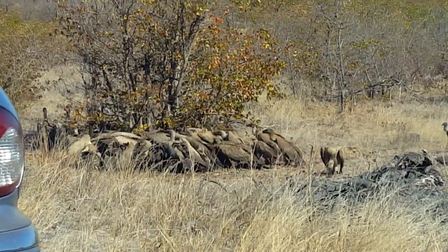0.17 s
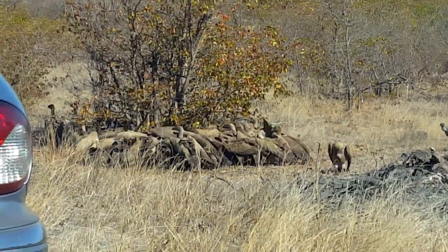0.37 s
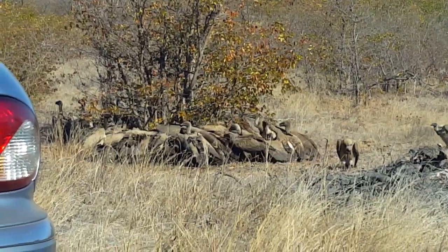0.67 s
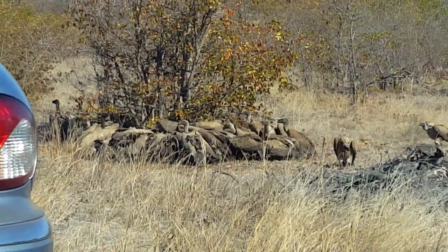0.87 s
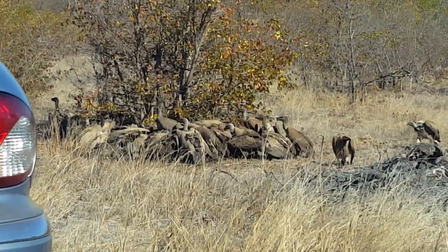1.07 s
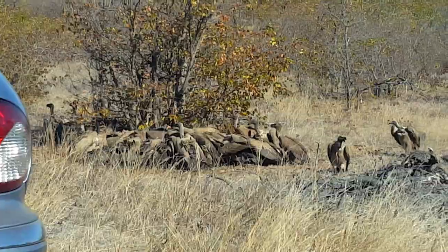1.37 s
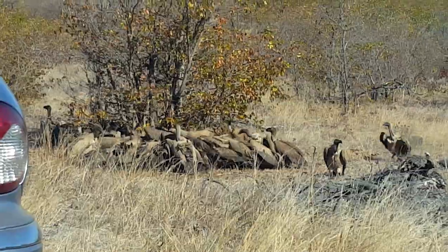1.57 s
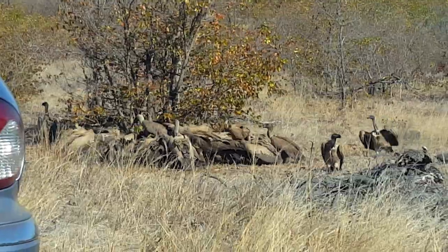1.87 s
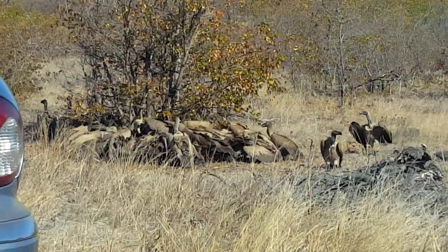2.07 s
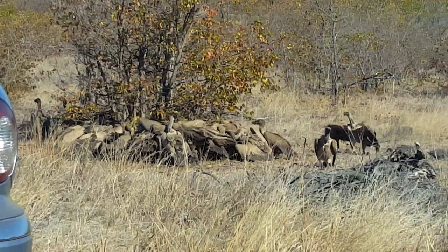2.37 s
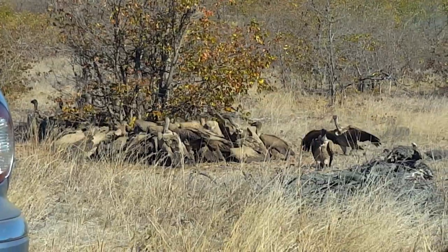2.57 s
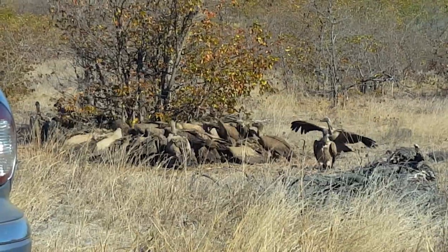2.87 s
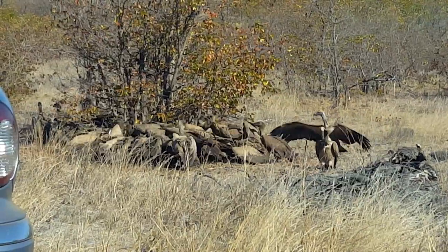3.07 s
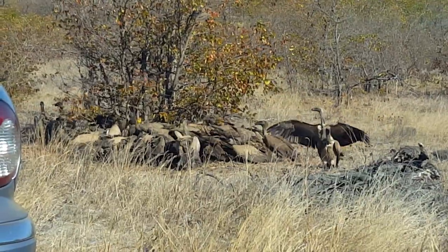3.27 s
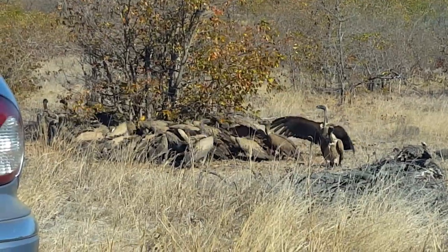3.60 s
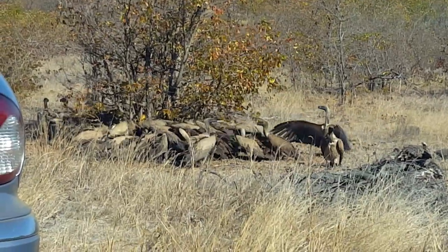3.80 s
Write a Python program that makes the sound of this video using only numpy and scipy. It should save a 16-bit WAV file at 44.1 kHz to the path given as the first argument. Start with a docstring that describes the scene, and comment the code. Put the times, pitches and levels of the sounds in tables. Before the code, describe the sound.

Vulture hissing and raspy squawks on the left only, strong early then faint, two short rasps near the end; low engine hum and wind bumps hit the stereo microphone unevenly in open grassland.

```python
"""In dry grass, beside an idling car, vultures hiss and rasp over a carcass.
Breath noise makes the hiss, ringing throats the rasps, sines the whistle; clicks and airy hiss join in.
Birds and engine reach only the left microphone port. The birds are weakened below a moving edge
in pitch, which climbs after most gusts. Wind buffets each port separately, over faint electronic hiss
on both and a faint high tone on the left."""
import sys
import numpy as np
from scipy import signal
from scipy.fft import rfft, irfft
from scipy.io import wavfile
from scipy.ndimage import uniform_filter1d

SR = 44100
rng = np.random.default_rng(int(sys.argv[2]) if len(sys.argv) > 2 else 0)


def amplitude_ratio(level_db):
    """Convert a level in decibels to the matching linear amplitude (field) ratio."""
    exponent = np.asarray(level_db, float) / 20
    return 10 ** exponent


def put_to_file(sound):
    """Save the sound as 16-bit audio at rate SR, in the file named by the first command-line argument."""
    columns = np.atleast_2d(sound).T  # one column per channel
    safe = np.clip(columns, -1, 1)
    whole_steps = np.round(safe * 32767)
    wavfile.write(sys.argv[1], SR, whole_steps.astype(np.int16))


N = 173754
TIME = np.arange(N) / SR

# Bird and engine levels are those before the gain of the left port.
# hiss of the flock over time: time_s, level_db, treble_db (against the level)
FLOCK_HISS = [(0, -64, -13), (.13, -56, -11), (.18, -52, -12), (.38, -52, -12), (.47, -56, -11),
              (.58, -57, -14), (.61, -62, -17), (.65, -55, -17), (.9, -54, -16), (1.12, -60, -16),
              (1.25, -62.5, -14), (1.72, -63.5, -14), (1.95, -66, -15), (2.35, -64, -16), (2.6, -60, -15),
              (2.95, -61.5, -14), (3.22, -60.5, -13), (3.45, -63, -16), (3.65, -65, -17),
              (3.94, -62.5, -16)]
# colour of that hiss: pitch_hz, relative_db_per_hz
FLOCK_COLOUR = [(1500, -9.5), (2800, -9), (3400, -5), (4100, -3), (4800, -6.5), (5600, -13.5), (7000, -22),
                (8500, -37), (11000, -44)]
# one list per rasp: time_s, level_db
RASP_LEVELS = [
    [(.52, -65), (.56, -50), (.595, -59.5), (.625, -65.5), (.64, -55.5), (.73, -50), (.92, -52), (1.0, -55),
     (1.17, -66)],
    [(3.07, -72), (3.1, -57), (3.14, -68), (3.18, -70), (3.21, -57), (3.25, -64), (3.36, -72)],
    [(3.66, -81), (3.69, -56), (3.725, -71), (3.76, -59), (3.9, -61), (3.96, -70)],
    [(2.38, -75), (2.45, -72.5), (2.92, -68.5)],
]
# resonances of the throat behind each rasp: pitch_hz, base_width_hz, relative_db
RASP_THROATS = [
    [(3010, 50, -3.5), (4170, 80, 0), (4600, 130, 0), (5150, 120, -5), (6800, 400, -17)],
    [(3400, 130, -9), (4050, 100, 0), (4780, 120, -8), (5300, 250, -9)],
    [(3340, 90, -6), (4140, 60, 0), (5400, 90, -8)],
    [(4830, 160, 0), (5750, 160, -3)],
]
# thin whistle, falling in pitch: time_s, pitch_hz, level_db
WHISTLE_PATH = [(2.6, 5100, -65), (2.64, 4810, -63.5), (2.668, 4720, -62), (2.694, 4545, -66),
                (2.736, 4400, -61), (2.815, 4375, -59), (2.84, 4170, -66), (2.895, 4100, -58),
                (2.945, 3790, -67)]
# beak and twig clicks: start_s, strength_db, ring_hz
CLICK_EVENTS = [(1.4401, -44, 3580), (3.582, -36.5, 4160)]
# airy top hiss over time: time_s, level_db
AIR_LEVEL = [(0, -76), (.15, -67.5), (.35, -64), (.57, -67.5), (.6, -78), (.71, -81), (.716, -62),
             (.76, -74), (.78, -83), (.89, -73), (.93, -75.5), (1.8, -82)]
# colour of the airy hiss: pitch_hz, relative_db_per_hz
AIR_COLOUR = [(8000, -13), (10500, -18.5), (12000, -4), (14000, -0.5), (16000, -5.5)]
# resting lower edge of the bird sound: time_s, edge_hz
RESTING_EDGE = [(0, 3000), (.2, 2770), (.9, 2740), (2.3, 2870), (3.94, 2780)]
# base pitch of the idling engine: time_s, pitch_hz
ENGINE_PITCH = [(0, 65.83), (.7, 66.18), (1.4, 64.06), (2.0, 63.72), (2.9, 65.26), (3.94, 65.9)]
# loudness of the engine: time_s, level_db
ENGINE_LEVEL = [(.15, -51), (.25, -53.5), (.45, -47.5), (.54, -60), (.76, -51), (1.1, -50.5), (1.2, -42),
                (1.36, -51), (1.6, -51), (1.75, -55), (1.82, -45.5), (1.97, -53), (2.1, -50.5),
                (2.9, -50.5), (3.35, -51.5), (3.55, -53), (3.94, -49.5)]
# tones of the engine: multiple_of_base_pitch, relative_db, wobble_db
ENGINE_ORDERS = [(1, -1.5, 3.03), (2, -14, 1.2), (3.5, -20.5, 3.56)]
# gusts: start_s, length_s, left_level_db, right_level_db, edge_rise_hz
GUST_EVENTS = [(0.027, 0.124, -56, -56.5, 2), (0.386, 0.1, -47.5, -54, 697),
               (1.125, 0.13, -47.5, -43.5, 697), (1.778, 0.089, -47.5, -43.5, 417),
               (1.857, 0.075, -46, -60, 600), (2.561, 0.1, -48, -45, 405), (3.125, 0.124, -61, -49.5, 2),
               (3.312, 0.11, -48.5, -48, 622), (3.671, 0.048, -51.5, -50, -4)]
# colours of steady wind and gusts at each port: pitch_hz, relative_db_per_hz
STEADY_LEFT = [(10, -27), (35, -10), (60, -6), (120, -3), (250, -11), (500, -20), (900, -30), (2000, -37),
               (5000, -50)]
STEADY_RIGHT = [(10, -22), (32, 0), (80, -1), (150, -7), (250, -17), (400, -29), (2000, -55)]
GUST_COLOUR_LEFT = [(20, -38), (90, 9.5), (200, 1), (500, -12), (1000, -23.5), (2000, -35.5), (4000, -83)]
GUST_COLOUR_RIGHT = [(20, -19), (90, -0.5), (150, -8), (300, -28.5), (600, -35), (1500, -73)]
# hiss of the electronics, same colour on both ports: pitch_hz, level_db_per_hz
ELECTRONICS = [(500, -103), (1000, -107), (3500, -110), (7000, -118), (10000, -121), (11200, -120),
               (12000, -116), (16000, -114)]

TREBLE_MEAN_DB, TILT_HZ = -16, 4900  # treble_db that leaves the colour alone; where the tilt starts
SLAPS_PER_S, SLAP_SPREAD_DB, BREATH_SHARE = 2000, 6, 0.45
EDGE_CUT_DB, EDGE_SOFT_HZ = -17, 6
EDGE_LAG_S, EDGE_RISE_S, EDGE_FALL_S = 0.058, 0.045, 0.08  # the lag counts from mid-gust
WIND_DB_LEFT, WIND_DB_RIGHT = -56, -54
LUMP_DB_LEFT, LUMP_DB_RIGHT, LUMP_HZ = 1.6, 4, 30
LEFT_PORT_DB, TOP_HZ = 5, 15735  # gain for birds and engine; upper limit of the whole mix


def evened(x):
    """Scales a sound to rms 1."""
    return x / np.sqrt(np.mean(x ** 2) + 1e-20)


def curve(rows, col=1):
    """Reads a column of a time table at every sample."""
    table = np.array(rows)
    return np.interp(TIME, table[:, 0], table[:, col])


def spectrum(points, hz):
    """Reads a colour table, in dB, on a logarithmic pitch axis."""
    f, value = np.transpose(points)
    return np.interp(np.log(hz + 1), np.log(f + 1), value)


def shaped(x, rule, size):
    """Changes a sound's short-time spectra by rule(hz, s), in dB."""
    overlap = size * 3 // 4
    hz, t, z = signal.stft(x, SR, nperseg=size, noverlap=overlap)
    z = z * amplitude_ratio(rule(hz[:, None], t))
    return signal.istft(z, SR, nperseg=size, noverlap=overlap)[1][:N]


def coloured(points):
    """Steady noise with the given spectrum in dB per Hz."""
    gain = amplitude_ratio(spectrum(points, np.fft.rfftfreq(N, 1 / SR)))
    return irfft(rfft(rng.standard_normal(N)) * gain, N) * np.sqrt(SR / 2)


def drift(rate_hz):
    """Smooth random wandering of rms 1, fading out above about rate_hz."""
    smoothing = 1 + (np.fft.rfftfreq(N, 1 / SR) / rate_hz) ** 4
    return evened(irfft(rfft(rng.standard_normal(N)) / smoothing, N))


def resonate(x, hz, width):
    """Rings a sound at a pitch that may move: shift it to zero, smooth it, shift it back."""
    turn = np.exp(2j * np.pi * np.cumsum(hz * np.ones(len(x))) / SR)
    r = np.exp(-np.pi * width / SR)
    return 2 * (turn * signal.lfilter([1 - r], [1, -r], x / turn)).real


def gate(rows, fade_s=.014):
    """Fades in and out at the ends of a time table."""
    return np.clip(np.minimum(TIME - rows[0][0], rows[-1][0] - TIME) / fade_s, 0, 1)


def smooth_grain(shape, across, along):
    """Random grain of rms 1, smoothed across pitch and along time."""
    grain = uniform_filter1d(rng.standard_normal(shape), size=across, axis=0)
    return evened(uniform_filter1d(grain, size=along, axis=1))


def flock():
    """Turbulent breath from many open beaks: patchy, fluttering noise whose treble comes and goes."""
    def rule(hz, t):
        shape = (len(hz), len(t))
        patches = smooth_grain(shape, across=5, along=14)
        ridges = smooth_grain(shape, across=2, along=90)  # narrow in pitch, long in time
        grain_db = 1.4 * patches + 2.0 * ridges
        tilt_db = np.interp(t, TIME, curve(FLOCK_HISS, col=2)) - TREBLE_MEAN_DB
        tilt_share = np.clip(np.log2(hz / TILT_HZ + 1e-9) / 0.34, 0, 1.2)
        return spectrum(FLOCK_COLOUR, hz) + grain_db + tilt_db * tilt_share
    hiss = evened(shaped(rng.standard_normal(N), rule, size=512))
    return hiss * amplitude_ratio(curve(FLOCK_HISS) + 0.38 * drift(28))


def rasp(rows, throat):
    """Irregular slaps of the voice membranes and breath noise ring a throat."""
    slap_size = amplitude_ratio(SLAP_SPREAD_DB * np.minimum(rng.exponential(1, N), 2))
    slaps = (rng.random(N) < SLAPS_PER_S / SR) * slap_size * rng.choice([-1, 1], N)
    drive = (1 - BREATH_SHARE) * evened(slaps) + BREATH_SHARE * rng.standard_normal(N)
    drive = drive * amplitude_ratio(1.6 * np.clip(drift(39), -2, 1.5))
    sway = 1 + .008 * drift(15)  # moves all the resonances together
    voice = 0
    for hz, width, db in throat:
        ring = resonate(drive, hz * sway, 1.6 * width)
        ring = resonate(ring, hz * sway, 6 * width)
        voice = voice + amplitude_ratio(db + 1.3 * drift(25)) * evened(ring)
    return evened(voice) * amplitude_ratio(curve(rows)) * gate(rows)


def whistle():
    """A sine slightly unsteady in pitch and level."""
    hz = curve(WHISTLE_PATH) + 12 * drift(59.9)
    tone = np.sqrt(2) * np.sin(2 * np.pi * np.cumsum(hz) / SR)
    return tone * amplitude_ratio(curve(WHISTLE_PATH, col=2) + 1.3 * drift(60)) * gate(WHISTLE_PATH)


def clicks():
    """Each click is a burst of noise and two dying sines, dulled by a low-pass."""
    out, t = np.zeros(N + 3000), np.arange(3000) / SR
    for s, db, hz in CLICK_EVENTS:
        ring = np.sin(2 * np.pi * hz * t) + np.sin(2 * np.pi * hz * 1.09 * t)
        ring = 0.25 * ring * amplitude_ratio(-60 * t / .035)  # falls 60 dB in 35 ms
        crack = .13 * rng.standard_normal(3000) * amplitude_ratio(-60 * t / .006)  # 60 dB in 6 ms
        out[round(s * SR):][:3000] += amplitude_ratio(db) * (ring + crack)
    return signal.lfilter(*signal.butter(2, 6000, fs=SR), out[:N])


def air():
    """Fine noise at the very top, flickering in level and fading to nothing at the table's end."""
    fade = np.clip((AIR_LEVEL[-1][0] - TIME) / 0.28, 0, 1)
    return evened(coloured(AIR_COLOUR)) * amplitude_ratio(curve(AIR_LEVEL) + 1.0 * drift(30)) * fade


def edge_filter(birds):
    """Weakens the birds below an edge that climbs fast and sinks slowly around each gust's lag."""
    edge_hz = curve(RESTING_EDGE)
    for s, length, _, _, rise_hz in GUST_EVENTS:
        t = TIME - s - length / 2 - EDGE_LAG_S
        hump = np.exp(-.5 * (t / np.where(t < 0, EDGE_RISE_S, EDGE_FALL_S)) ** 2)
        edge_hz = edge_hz + rise_hz * hump

    def rule(hz, t):
        above = (hz - np.interp(t, TIME, edge_hz)) / EDGE_SOFT_HZ
        return EDGE_CUT_DB / (1 + np.exp(np.clip(above, -50, 50)))
    return shaped(birds, rule, size=1024)


def engine():
    """Low tones at multiples of the idle's base pitch, each wobbling in level and phase."""
    turns = np.cumsum(curve(ENGINE_PITCH)) / SR
    tones = 0
    for k, db, wobble_db in ENGINE_ORDERS:
        phase = k * turns + rng.random() + 0.048 * k * drift(8.0)  # in turns
        tones = tones + amplitude_ratio(db + wobble_db * drift(27)) * np.sin(2 * np.pi * phase)
    return amplitude_ratio(curve(ENGINE_LEVEL)) * np.sqrt(2) * tones


def wind(steady, steady_db, gusty, lump_db, col):
    """Lumpy buffeting noise at one port: a steady part, and gusts with their own colour."""
    lumps = amplitude_ratio(lump_db * np.clip(drift(LUMP_HZ), -2.5, 1.6))
    gusts = 0
    for row in GUST_EVENTS:
        ends = [(row[0],), (row[0] + row[1],)]
        gusts = gusts + amplitude_ratio(row[col]) * gate(ends, fade_s=0.018)
    steady_part = amplitude_ratio(steady_db + 0.67 * drift(4.7)) * evened(coloured(steady) * lumps)
    return steady_part + gusts * evened(coloured(gusty) * np.sqrt(lumps))


def whine():
    """A faint high sine that wavers in pitch."""
    hz = 11400 * (1 + 0.0011 * drift(71))
    return amplitude_ratio(-89) * np.sin(2 * np.pi * np.cumsum(hz) / SR)


def electronics():
    """Faint steady noise of the circuits, drawn afresh for each port."""
    return coloured(ELECTRONICS)


def scene():
    """Birds pass the moving edge into the left port with the engine; each port has its own wind."""
    birds = flock() + whistle() + clicks() + air()
    for rows, throat in zip(RASP_LEVELS, RASP_THROATS):
        birds = birds + rasp(rows, throat)
    left = amplitude_ratio(LEFT_PORT_DB) * (edge_filter(birds) + engine())
    left = left + wind(STEADY_LEFT, WIND_DB_LEFT, GUST_COLOUR_LEFT, LUMP_DB_LEFT, col=2)
    left = left + whine() + electronics()
    right = wind(STEADY_RIGHT, WIND_DB_RIGHT, GUST_COLOUR_RIGHT, LUMP_DB_RIGHT, col=3) + electronics()
    return np.array([left, right])


def low_pass(x):
    """Removes everything above the highest recorded frequency."""
    return signal.sosfilt(signal.butter(12, 15740, fs=SR, output="sos"), x)


def record(dry):
    """Removes everything from the upper band limit on."""
    kept = np.fft.rfftfreq(N, 1 / SR) < TOP_HZ
    mix = irfft(rfft(dry) * kept, N)
    return low_pass(mix)


dry = scene()
out = record(dry)
put_to_file(out)
```